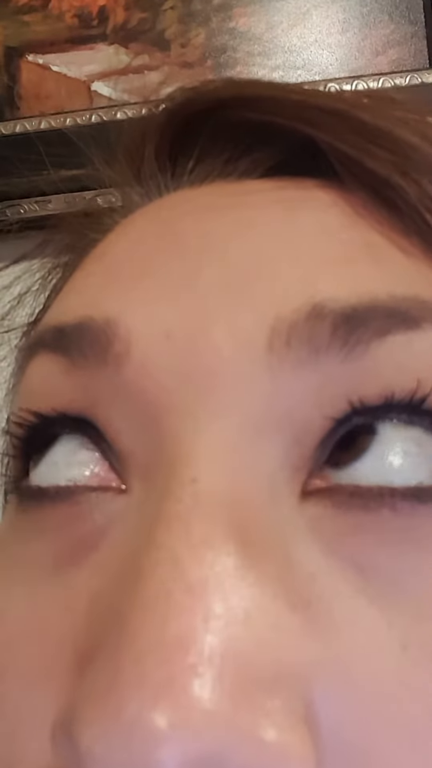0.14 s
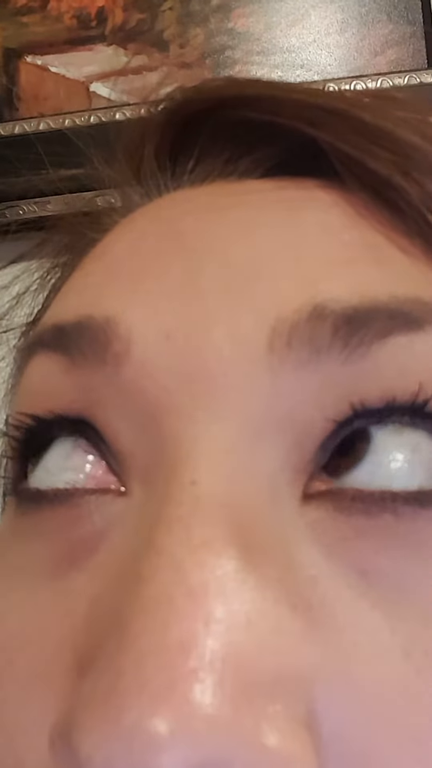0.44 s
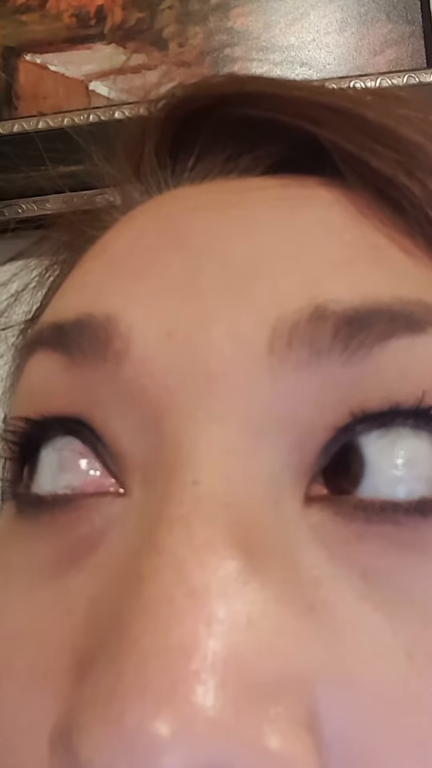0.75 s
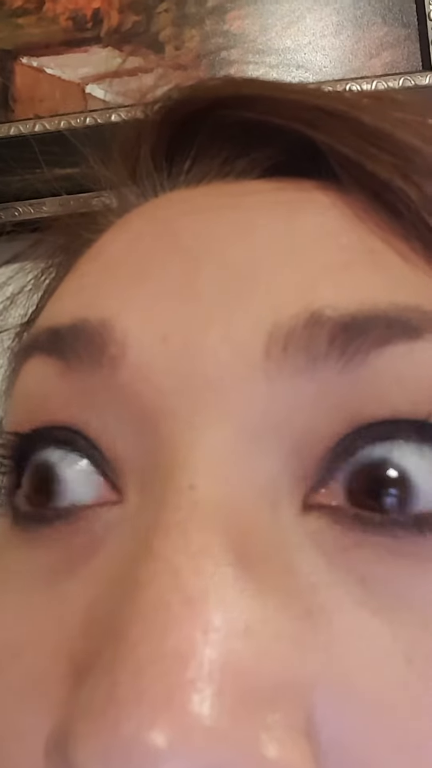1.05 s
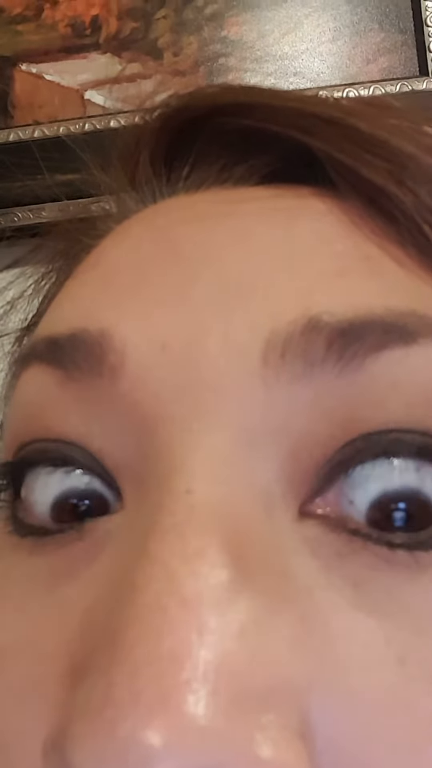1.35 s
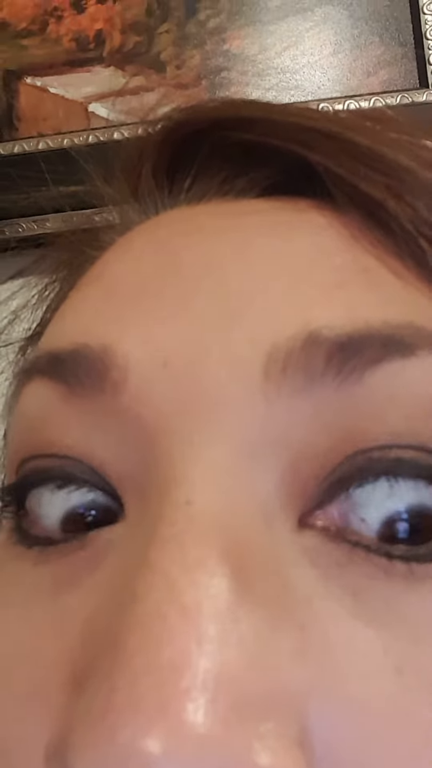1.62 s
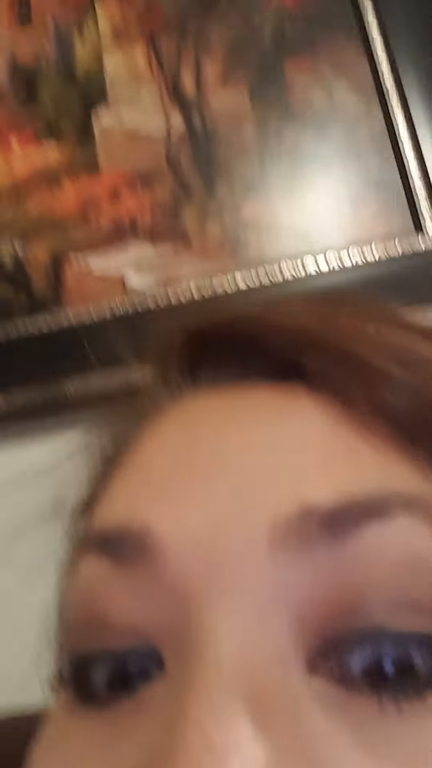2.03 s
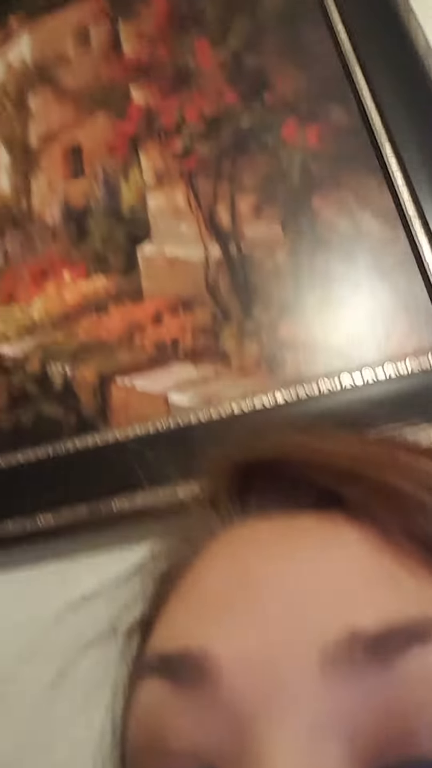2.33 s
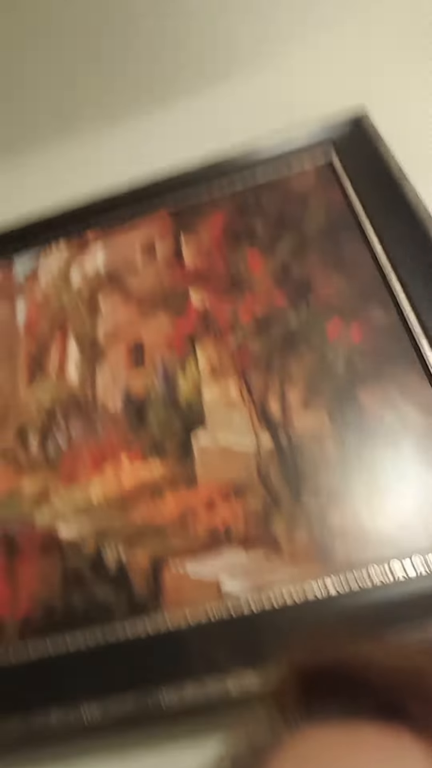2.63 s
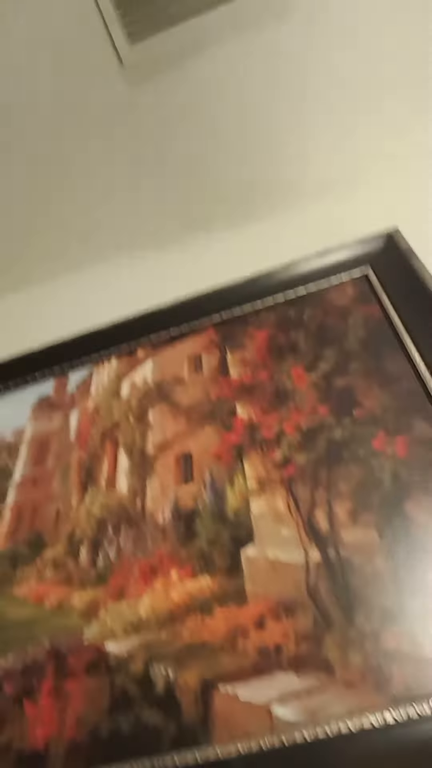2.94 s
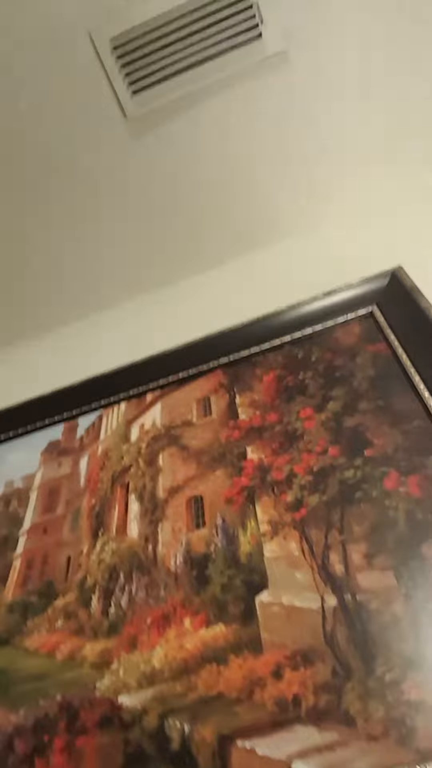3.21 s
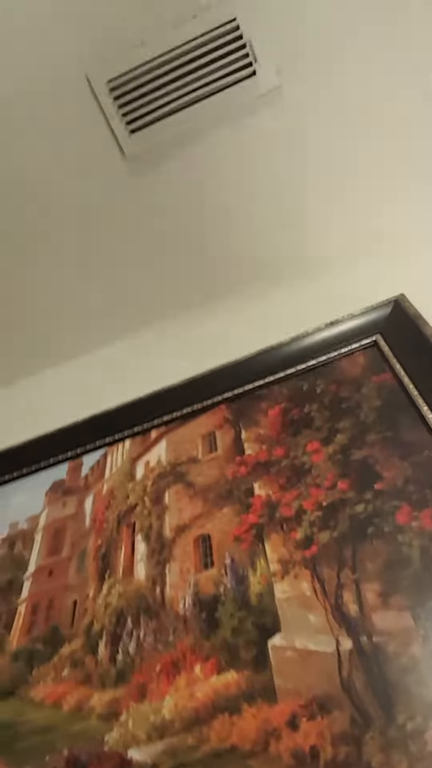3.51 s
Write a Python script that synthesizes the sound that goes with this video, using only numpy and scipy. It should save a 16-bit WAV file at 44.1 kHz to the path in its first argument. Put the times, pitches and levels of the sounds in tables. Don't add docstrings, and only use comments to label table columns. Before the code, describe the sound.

Blows on the floor above make the ceiling thud, knock and boom in uneven clusters; a quiet ventilation hum continues beneath, with slight hand rustle close to the phone's two microphones.

```python
import sys
import numpy as np
from scipy import signal
from scipy.io import wavfile

SR = 44100
rng = np.random.default_rng(int(sys.argv[2]) if len(sys.argv) > 2 else 0)


def nominal_scale(level):
    x = np.asarray(level, float) / 20
    return 10 ** x


def unload_audio(sound):
    columns = np.transpose(np.atleast_2d(sound))
    steps = np.round(np.clip(columns, -1, 1) * 32767)
    wavfile.write(sys.argv[1], SR, steps.astype(np.int16))


N = 161847

LAG_S, TURNED_LAG_S = 0.00032, 0.0001
PORT_TILT = nominal_scale(np.array([[0.8], [-0.8]]))


def evened(x):
    return x / np.sqrt(np.mean(x ** 2) + 1e-20)


def read(points, hz):
    f, value = np.transpose(points)
    return np.interp(np.log(hz + 1), np.log(f + 1), value)


def slow(rate_hz, t):
    drift = 0
    for f in np.geomspace(rate_hz / 20, rate_hz, 16):
        drift = drift + np.sin(2 * np.pi * (f * t + rng.random())) / np.sqrt(f)
    return evened(drift)


def turned(t):
    middle_s, length_s = 2.18, 0.41
    return np.clip((t - middle_s) / length_s + 0.5, 0, 1)


def lag(t):
    return LAG_S + (TURNED_LAG_S - LAG_S) * turned(t)


def pair(shape_db, size=1024):
    # frequency in Hz, correlation 0 to 1.
    likeness = [(60, 1), (200, 0.99), (330, 0.9), (500, 0.55), (900, 0.095), (2000, 0.17), (5000, 0.11),
                (12000, 0.057)]
    # frequency in Hz, left minus right in dB.
    balance_db = [(60, 1), (180, 0.5), (550, -1), (1650, 1.5), (4970, 1.5), (15000, 1.5)]
    # frequency in Hz, phase in cycles.
    behind_cycles = [(60, 0.032), (140, 0.035), (260, 0.028), (500, 0.07), (2200, 0.4), (8000, 0.24)]
    hop = size // 4
    t = np.arange(N // hop + 5) * hop / SR
    hz = np.fft.rfftfreq(size, 1 / SR)[:, None]
    a, b, c, d = rng.standard_normal((len(t), len(hz), 4)).T
    left, other = a + 1j * b, c + 1j * d
    same = np.clip(read(likeness, hz), -1, 1)
    cycles = read(behind_cycles, hz) * (1 - 0.1 * turned(t - 0.6))
    right = same * left * np.exp(-2j * np.pi * cycles) + np.sqrt(1 - same ** 2) * other
    lean = read(balance_db, hz) / 2
    z = np.array([left * nominal_scale(lean), right * nominal_scale(-lean)]) * nominal_scale(shape_db(hz, t))
    return evened(signal.istft(z, nperseg=size, noverlap=size - hop)[1][:, :N])


def motor():
    # frequency in Hz, level before the turn in dB rms, level after in dB rms.
    lines = [(62.5, -53.5, -59), (65.6, -62, -65), (83.5, -66, -66), (100.68, -55.5, -59),
             (120.0, -54.5, -51), (129.8, -65, -65), (136.9, -62, -63), (139.35, -56.5, -56.5),
             (177.5, -69, -73)]
    # time in seconds, slip in turns.
    slip = [(.5, 0), (2.2, -.22), (2.4, -.8), (2.5, -1), (2.8, -1.95), (3.1, -2.12)]
    mains_hz, throb_hz, throb_peak_s, waver_db = 120, 19.335, 0.143, 0.46
    t = np.arange(N) / SR
    coarse = t[::200]
    late = t - np.array([[0], [1]]) * lag(t)
    slip_turns = np.interp(t, *np.transpose(slip))
    out = np.zeros((2, N))
    for hz, before_db, after_db in lines:
        waver = waver_db * np.interp(t, coarse, slow(8.5, coarse))
        line_db = before_db + (after_db - before_db) * turned(t) + waver
        cycles = hz * (late - throb_peak_s)
        order = round((hz - mains_hz) / throb_hz)
        if abs(hz - mains_hz - order * throb_hz) < 0.2:
            cycles = cycles + order * slip_turns
        else:
            cycles = cycles + rng.random()
        out += np.sqrt(2) * nominal_scale(line_db) * np.sin(2 * np.pi * cycles)
    return PORT_TILT * out


def whine():
    # frequency in Hz, level in dB rms.
    tones = [(10852, -99), (10881.5, -95.5), (10910.8, -93.5), (10939.4, -104)]
    t = np.arange(N) / SR
    port_cycles = np.array([[0], [0.12]])
    out = np.zeros((2, N))
    for hz, db in tones:
        cycles = hz * t + 0.15 * rng.random() + port_cycles
        out += np.sqrt(2) * nominal_scale(db) * np.sin(2 * np.pi * cycles)
    return out


def air():
    # frequency in Hz, level in dB per Hz.
    rumble = [(18, -26), (35, -17.5), (55, 1.5), (70, -9.5), (90, 4), (145, 0.5), (170, -4.5), (260, -18)]
    # frequency in Hz, level in dB per Hz.
    hiss = [(120, -25), (200, -1.5), (372, -7), (566, -19), (1240, -17.5), (2440, -25), (6660, -37),
            (10700, -37.5), (15700, -34.5)]
    rumble_db, hiss_db, swell_db = -53, -60.5, 0.6
    low = pair(lambda hz, s: read(rumble, hz) - 60 * (hz > 300) + 0 * s, size=4096)
    high = pair(lambda hz, s: read(hiss, hz) + swell_db * slow(5.4, s))
    return nominal_scale(rumble_db) * low + nominal_scale(hiss_db) * high


def rustle():
    # frequency in Hz, level in dB per Hz.
    colour = [(5500, -25), (7500, -9.5), (9000, -3), (10500, -1), (13000, -12)]
    # time in seconds, level in dB.
    stir = [(0, -18), (.15, 0), (.45, 4), (1.0, 5.5), (1.3, -4), (1.9, 6), (2.1, 3), (3.2, -14),
            (3.67, -32)]
    rustle_db, flicker_db = -83, 4.5

    def shape_db(hz, s):
        return read(colour, hz) + np.interp(s, *np.transpose(stir)) + flicker_db * slow(240, s)

    return nominal_scale(rustle_db) * pair(shape_db, size=256)


def thumps():
    # start in seconds, then knock, thud, tick and bump levels in dB.
    impacts = [(0.0787, -74, -74, -84, -70), (0.1703, -53, -60, -73, -52.5),
               (0.2694, -81, -61, -86, -83), (0.366, -52.5, -61, -99, -52.5),
               (0.5016, -49.5, -55, -87, -50), (0.585, -57, -64, -103, -53),
               (0.666, -50.5, -62, -92, -53), (0.7594, -78, -59, -93, -76),
               (1.023, -52.5, -45.5, -67.5, -48), (1.1085, -62, -55, -75, -60),
               (1.268, -49, -52.5, -65.5, -54), (1.44, -57, -49.5, -71, -59),
               (1.475, -51.5, -48, -68, -56), (1.515, -50, -43, -71, -53),
               (1.563, -49, -54, -66.5, -49), (1.6974, -46.5, -35.5, -62.5, -45.5),
               (1.7532, -44.5, -46, -53.5, -49), (1.789, -59, -65, -69, -62),
               (1.8594, -58.5, -76, -70, -64), (1.9494, -62, -58, -72.5, -62.5),
               (2.051, -47.5, -46, -64, -45.5), (2.163, -52.5, -48.5, -71, -52),
                   (2.198, -61, -65, -73, -74), (2.345, -54.5, -50.5, -72, -61),
                   (2.3905, -52, -44.5, -70.5, -58.5), (2.5711, -61.5, -67, -84, -70),
                   (2.6454, -59.5, -71, -77, -65), (2.7022, -52, -45, -63.5, -48),
                   (2.744, -44.5, -45, -60.5, -49), (2.9063, -60.5, -59, -78, -80),
                   (3.0017, -56.5, -50.5, -63.5, -62), (3.0214, -55, -68, -80, -70),
                   (3.098, -67, -61, -85, -65), (3.288, -54, -55, -71.5, -62.5),
                   (3.3593, -73, -59, -85, -60), (3.502, -55, -75, -75, -58.5),
                   (3.597, -49, -49.5, -67, -49.5), (3.6343, -44.5, -64, -63, -47)]
    # frequency in Hz, level in dB per Hz.
    knock = [(700, -13), (1200, -6.5), (1700, -2.5), (2400, -2), (3400, -12), (5000, -30), (12000, -29)]
    thud = [(60, -25), (110, -15), (150, 2), (260, -1.5), (420, 0.5), (550, -6), (800, -11), (4000, -102)]
    tick = [(1500, -24), (2800, -7), (3500, 20.5), (5000, 13), (8000, 0.5), (12000, -23), (16000, -70)]
    bump = [(250, -3.5), (500, -1), (700, -3.5), (1100, -5.5), (1500, -11), (2500, -11.5), (8000, -63.5)]
    # rise in seconds, T60 in seconds,
    # early boost in dB, its length in seconds, trim in dB.
    rise_s = [0.0048, 0.014, 0.0057, 0.011]
    t60_s = [0.56, 0.46, 0.35, 0.49]
    early_db = [3.67, 0.82, 1.2, 1.24]
    early_s = [0.1, 0.089, 0.012, 0.13]
    trim_db = [-9.5, -2.5, -0.5, -2]
    lead_s = 0.006
    t = np.arange(SR * 3 // 4) / SR
    rows = np.array(impacts)
    starts = np.round((rows[:, 0] - lead_s) * SR).astype(int)
    out = np.zeros((2, N))
    for j, colour in enumerate((knock, thud, tick, bump)):
        blows = np.zeros(N)
        blows[starts] = nominal_scale(rows[:, j + 1] + trim_db[j]) ** 2
        rise = 1 - np.exp(-(t / rise_s[j]) ** 2)
        decay_db = early_db[j] * np.exp(-(t / early_s[j]) ** 2) - 60 * t / t60_s[j]
        power = signal.fftconvolve(blows, (rise * nominal_scale(decay_db)) ** 2)[:N]
        out += np.sqrt(abs(power)) * pair(lambda hz, s: read(colour, hz) + 0 * s)
    return out


def rings():
    # start in seconds, level in dB rms, frequency in Hz.
    panels = [(0.172, -68, 1730), (0.175, -61, 496), (0.365, -79, 2420), (0.38, -59, 402),
              (0.498, -63, 1475), (0.5, -61.5, 428), (0.504, -63.5, 2379), (0.51, -65, 556),
              (0.583, -67, 1730), (0.661, -65, 1475), (0.664, -63, 1760), (0.668, -64.5, 492),
              (0.67, -64, 2379), (1.021, -51, 312), (1.025, -65, 1077), (1.046, -51, 420),
              (1.535, -59, 635), (1.55, -51, 377), (1.561, -60, 2487), (1.567, -63, 711), (1.572, -56, 484),
              (1.692, -51, 269), (1.703, -60.5, 872), (1.705, -64, 1798), (1.705, -50.5, 571),
              (1.725, -51.5, 409), (1.74, -51, 291), (1.753, -65, 1066), (1.759, -67, 829),
              (1.76, -65, 2369), (1.773, -54.5, 506), (1.809, -54, 291), (2.048, -52, 280),
              (2.057, -60, 431), (2.059, -70, 571), (2.063, -65, 1389), (2.063, -62.5, 711),
              (2.072, -61.5, 1690), (2.19, -68, 2620), (2.345, -68, 1150), (2.387, -54, 334),
              (2.388, -61, 592), (2.4, -67, 1040), (2.704, -64, 1109), (2.708, -65, 2627),
              (2.709, -60, 388), (2.742, -60.5, 571), (2.741, -52, 420), (2.747, -61, 958),
              (2.747, -58, 1109), (2.748, -74, 2239), (2.746, -50.5, 323), (2.754, -62, 2476),
              (3.602, -61, 2455), (3.613, -57, 1949), (3.613, -54, 301), (3.623, -62, 829)]
    peak_s, trim_db, shorter_above_hz, rough = 0.012, 1.5, 500, 0.6
    t = np.arange(4000) / SR
    out = np.zeros((2, N + len(t)))
    for s, db, hz in panels:
        phase, apart = rng.random(2)
        life = peak_s * min(shorter_above_hz / hz, 1) ** 0.5
        brief = 1 - life / peak_s
        behind = 0.04 + 0.5 * apart * brief
        swell = t / life * np.exp(0.5 - 0.5 * (t / life) ** 2)
        swell *= np.sqrt(2 * peak_s / life) * nominal_scale(db + trim_db)
        swell *= 1 + rough * brief * slow(390, t)
        start = round((s + 0.8 * (peak_s - life)) * SR)
        cycles = hz * t + phase - np.array([[0], [behind]])
        out[:, start:start + len(t)] += swell * np.sin(2 * np.pi * cycles)
    return out[:, :N]


def clicks():
    # start in seconds, level in dB, frequency in Hz.
    contacts = [(.195, -67.5, 10200), (0.501, -52, 1630), (0.506, -53, 2310), (.590, -51, 2120),
                (.663, -70.5, 9500), (0.668, -52, 1700), (.671, -55, 2360), (1.264, -55, 3300),
                (1.697, -50.5, 3500), (1.754, -48, 3280), (1.026, -60.5, 1530), (2.053, -60, 3270),
                (2.343, -57.5, 3180), (2.348, -56.5, 2100), (2.393, -58, 2970), (2.396, -52.5, 1260),
                (2.749, -48, 3130), (3.005, -56, 2560), (3.005, -51, 400)]
    peak_s, half_width, grit = 0.0012, 0.3, 0.9
    t = np.arange(600) / SR
    out = np.zeros((2, N))
    for s, db, hz in contacts:
        band_hz = np.array([1 - half_width, 1 + half_width]) * hz
        band = signal.butter(3, band_hz, "bandpass", fs=SR, output="sos")
        noise = grit * evened(signal.sosfilt(band, rng.standard_normal(len(t))))
        burst = t / peak_s * np.exp(1 - t / peak_s)
        snap = nominal_scale(db) * (np.sin(2 * np.pi * hz * t) + noise) * burst
        for port in (0, 1):
            start = round((s + port * TURNED_LAG_S) * SR)
            out[port, start:start + len(t)] += snap
    return out


def booms():
    # start in seconds, level in dB, frequency in Hz.
    flexes = [
        (1.024, -56, 408),
        (1.45, -73, 40.2),
        (1.7, -77, 31.8),
        (1.699, -48.5, 148.4),
        (2.33, -68, 26),
        (2.399, -79, 374),
        (2.69, -58, 32),
        (2.719, -64, 201),
        (3.26, -61, 26.9),
    ]
    rise_s, t60_at_100_hz_s, trim_db = 0.014, 0.5, 10
    out = np.zeros(N)
    for s, db, hz in flexes:
        t = np.maximum(np.arange(N) / SR - s, 0)
        decay_db = 60 * t / t60_at_100_hz_s * (hz / 100) ** 0.31
        rise = 1 - np.exp(-t / rise_s)
        out += nominal_scale(db + trim_db - decay_db) * rise * np.sin(2 * np.pi * hz * t)
    return PORT_TILT * out


def scene():
    room = motor() + whine() + air() + rustle()
    return room + thumps() + rings() + clicks() + booms()


def top_cut(x):
    return signal.sosfilt(signal.butter(12, 15880, fs=SR, output="sos"), x)


def record(dry):
    edge = signal.firwin(511, 15850, window=("kaiser", 9), fs=SR)
    mix = signal.oaconvolve(dry, edge[None], "same") - 0.0006
    return top_cut(mix)


dry = scene()
out = record(dry)
unload_audio(out)
```